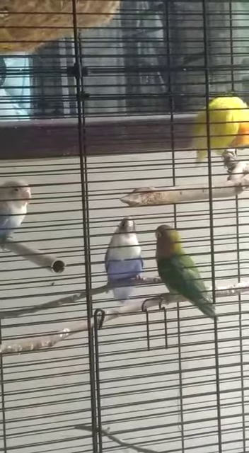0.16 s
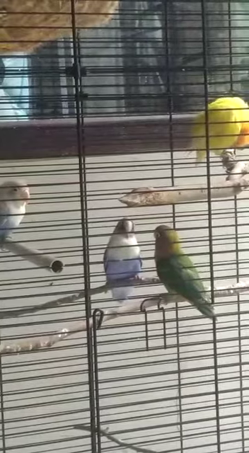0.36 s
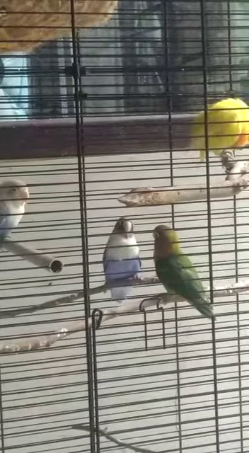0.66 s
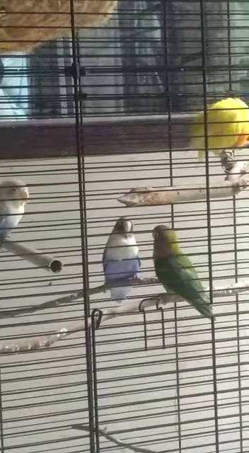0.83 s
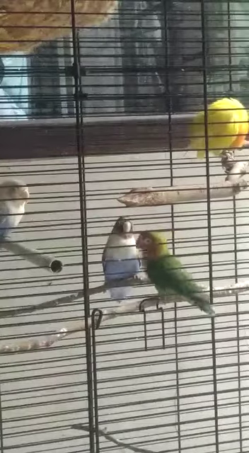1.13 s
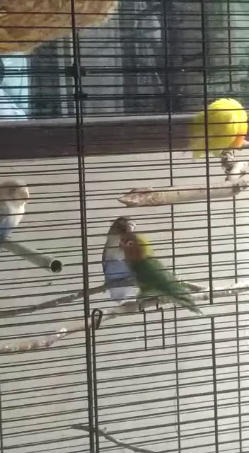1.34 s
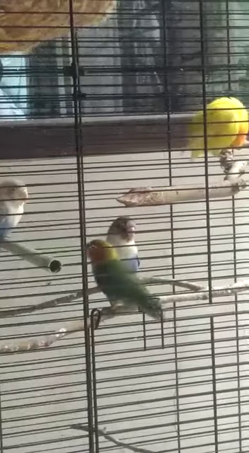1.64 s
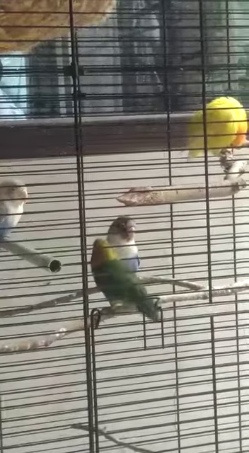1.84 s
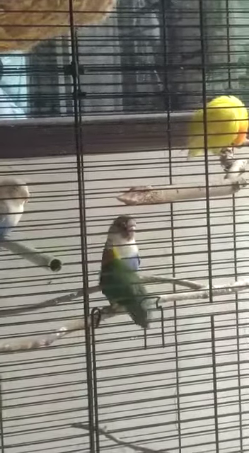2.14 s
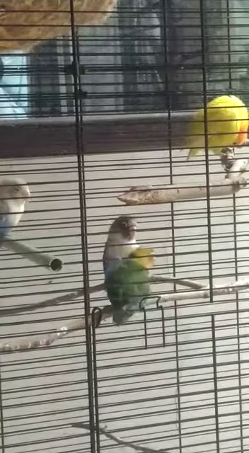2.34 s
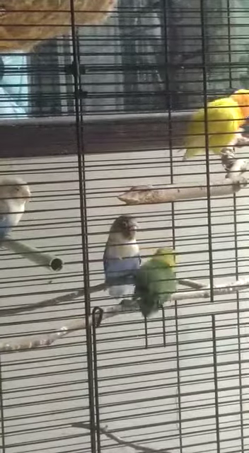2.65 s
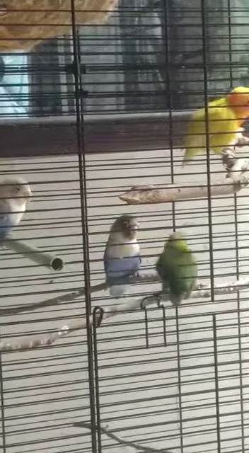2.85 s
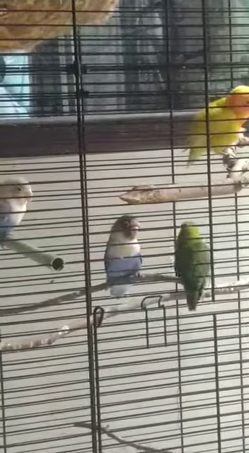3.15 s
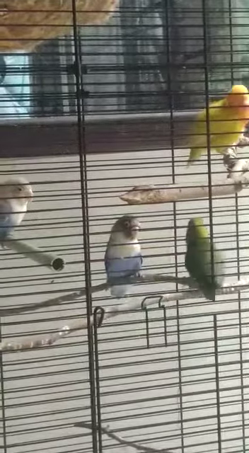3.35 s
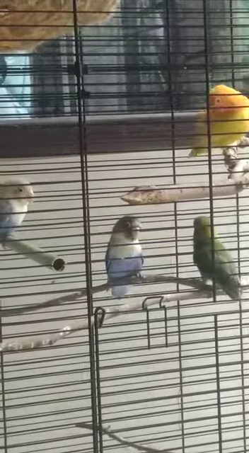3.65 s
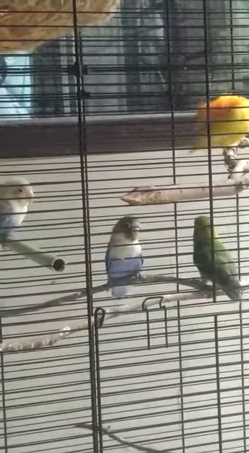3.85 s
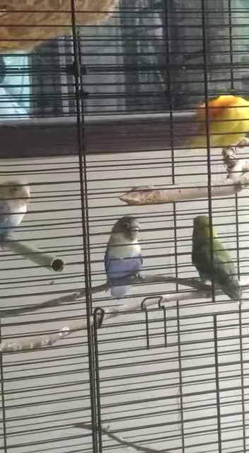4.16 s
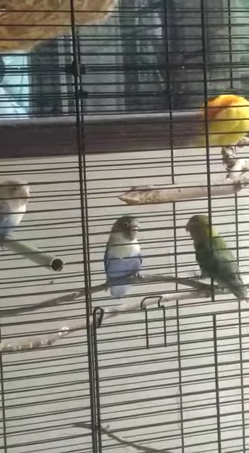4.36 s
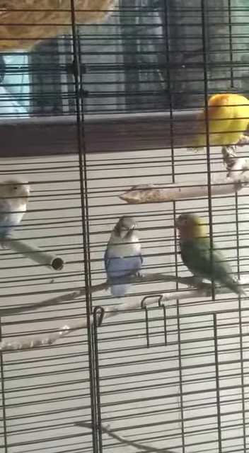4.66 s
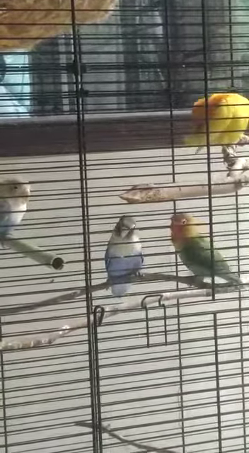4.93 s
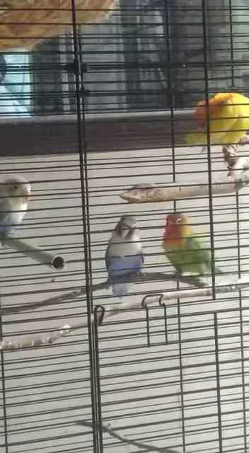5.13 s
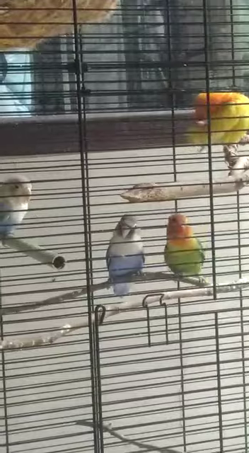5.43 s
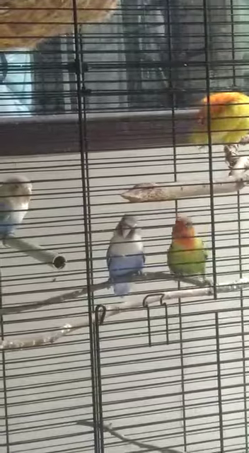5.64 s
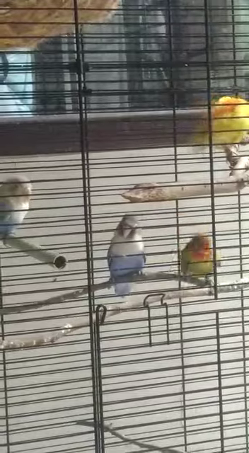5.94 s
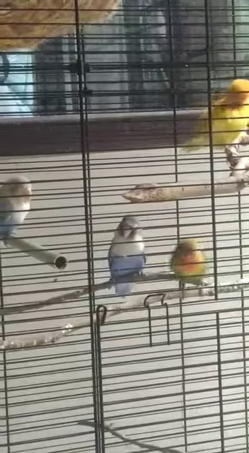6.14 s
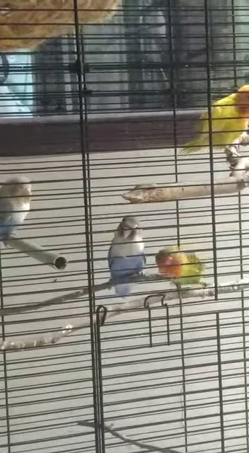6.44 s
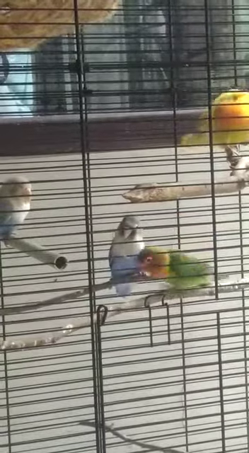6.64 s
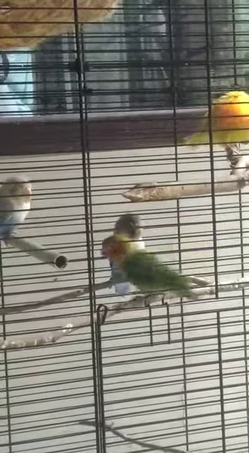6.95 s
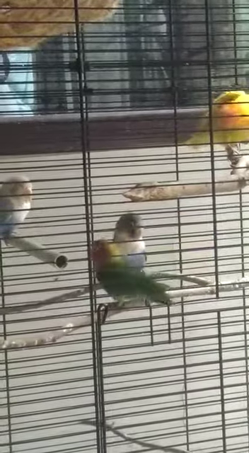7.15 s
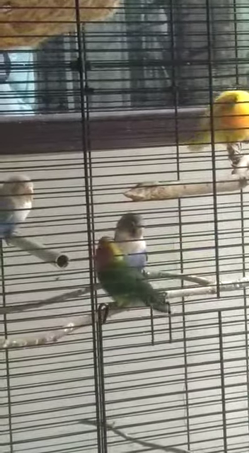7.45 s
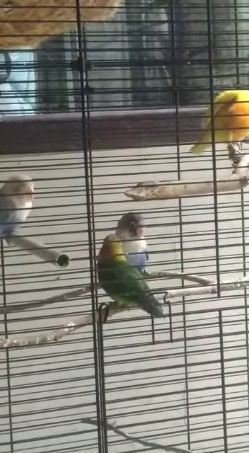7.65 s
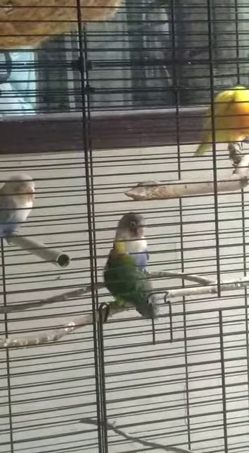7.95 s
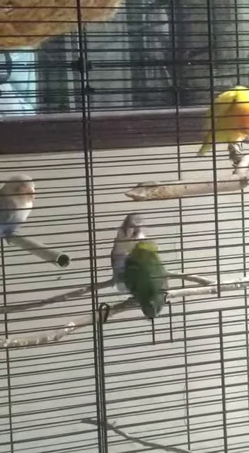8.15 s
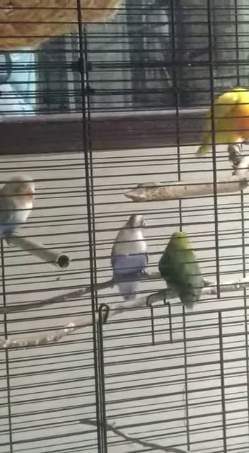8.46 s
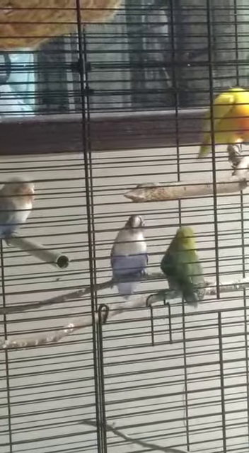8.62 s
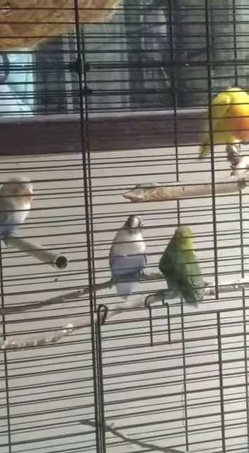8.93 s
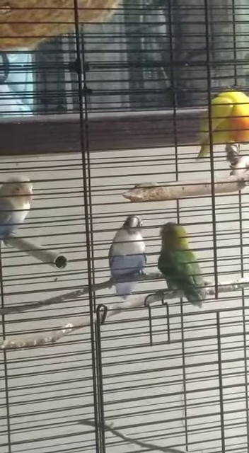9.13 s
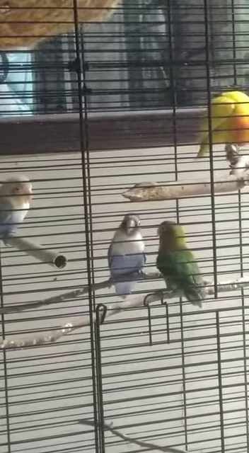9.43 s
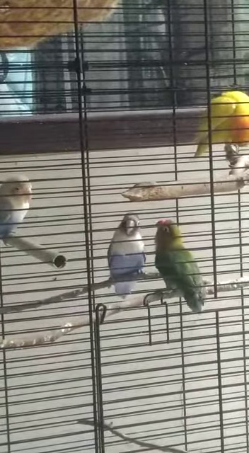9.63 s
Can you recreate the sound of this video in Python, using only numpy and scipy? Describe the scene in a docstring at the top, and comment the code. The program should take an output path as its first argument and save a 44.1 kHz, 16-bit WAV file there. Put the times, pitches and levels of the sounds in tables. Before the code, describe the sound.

Several small caged parrots are heard indoors by a handheld microphone nearby. Soft, high cheeps that slide downward come one at a time, clustering around seven seconds, while perches rustle faintly. A close bird makes a short scratchy squeak early on, a piercing, rapidly bending outburst past eight seconds and a last sharp chirp near the end. Short reverberation follows each call, over unsteady engine-like drone, thin hum and soft hiss.

```python
"""First comes the dying echo of a whistle that ends as the sound begins, over rumble, a wavering hum and air hiss.
Small caged parrots in a hard-walled room: a near bird whistles loud bent notes, farther ones give falling cheeps.
Both voices are harmonic tones, each with a coloured hiss; feet and feathers rustle as puffs of filtered noise.
Random spectra make the air and traffic, resonated noise the hum, and sparse random echoes the room."""
import sys
import numpy as np
from scipy import signal
from scipy.fft import rfft, irfft
from scipy.io import wavfile
from scipy.ndimage import uniform_filter1d, map_coordinates

SR = 44100
rng = np.random.default_rng(int(sys.argv[2]) if len(sys.argv) > 2 else 0)


def waveform_to_disk(signal):
    """Save audio, clipped to [-1, 1], as 16-bit WAV at the path in sys.argv[1]."""
    frames = np.transpose(np.atleast_2d(signal))
    scaled = np.clip(frames, -1, 1) * 32767
    samples = np.round(scaled).astype(np.int16)
    wavfile.write(sys.argv[1], SR, samples)


N = 431738  # length in samples
LEAD_S = 0.1  # time computed ahead of zero, so that earlier sound leaves its echo

# Spectrum of the air noise: pitch_hz, density_db (relative, per Hz)
AIR_SPECTRUM = [(20, -45), (38, -35), (48, -8.5), (75, -1), (100, 0), (122, -7), (160, -7), (300, -11.5),
                (600, -13), (1300, -16.5), (3200, -21), (4200, -21), (6300, -27), (8500, -24),
                (10000, -34.5), (15800, -39.5)]
AIR_DB = -52  # overall rms level
# Likeness of the air noise at the two ears: pitch_hz, likeness (0-1)
EAR_LIKENESS = [(60, 1), (150, 0.92), (380, 0.74), (950, 0.22), (2000, 0)]
# Slow swells of traffic: start_s, drone_db, traffic_db (only its departure from the mean counts)
TRAFFIC = [(0.0, -67, -66.5), (0.19, -56, -57), (0.49, -63, -67.5), (0.65, -60, -59.5), (2.1, -65.5, -64),
           (2.53, -57, -56), (4.39, -55, -58), (4.55, -65, -56), (4.96, -63.5, -62), (7.12, -53.5, -58.5),
           (7.2, -62, -58.5), (8.24, -61, -57), (8.34, -65, -59.5), (8.97, -59, -56.5), (9.79, -61.5, -60)]
DRONE_HZ, DRONE_WANDER_HZ, WANDER_SPAN_S = 59.1, 4.1, 0.23  # middle pitch, rms wander, smoothing span
# Steady hum tones: pitch_hz, width_hz (of each of two resonances), level_db
HUM_TONES = [(257.6, 7.7, -66.5), (354, 8.4, -68), (780, 4.2, -69), (1295, 7, -70)]

# Decay of the room echoes: pitch_hz, t60_s
ROOM_DECAY = [(1500, 0.34), (2500, 0.41), (4200, 0.35), (5500, 0.4), (7000, 0.31), (9000, 0.39),
              (14000, 0.3)]
NEAR_ROOM_DB, FAR_ROOM_DB = -4, -1  # sent to the room by the near bird; by far birds and rustles
# Single bounces off the cage tray, perch and wall: delay_s, left_db, right_db, right_later_s
BOUNCES = [(.0011, -41, -15.5, 0.012), (.0023, -16.5, -3, 0.011), (.0062, -4, -5.5, -0.0085),
           (0.01, -18.5, -8.5, -0.024)]
RIGHT_LAG_S = 0.000032  # direct sound arrives later at the right

# Rustles on the perches: start_s, level_db (before a common 9 dB cut), centre_hz, t60_s
RUSTLES = [(0.376, -40.5, 781, 0.11), (0.706, -44.5, 1290, 0.14), (2.062, -53, 2280, 0.22),
           (2.285, -44.5, 705, 0.36), (2.637, -46.5, 770, 0.55), (3.968, -43.5, 606, 0.27),
           (5.233, -46.5, 791, 0.56), (5.33, -47, 740, 0.15), (6.156, -48, 1290, 0.13),
           (6.423, -40, 950, 0.09), (6.982, -40.5, 1250, 0.18), (7.061, -40, 970, 0.3),
           (7.188, -41.5, 770, 0.092), (7.302, -43, 1030, 0.11), (8.159, -42, 1130, 0.18),
           (8.789, -41.5, 767, 0.16)]

# Colour of the hiss that goes with each whistle: pitch_hz, response_db (relative)
HISS_COLOUR = [(1200, -86), (2000, -8), (2500, 6), (3000, 4), (5000, 1.5), (7000, 5), (9000, 2.5),
               (12000, -29), (15000, -16)]
# Third, fourth and fifth harmonics: level_db (above the second)
UPPER_HARMONICS_DB = [-8.5, -9, -17]
PITCH_WOBBLE = 0.017  # rms unsteadiness as a share of the pitch
OVERTONE_TOP_HZ = 15200  # overtones fade around here

# Far cheeps: start_s, held_s, length_s, held_hz, end_hz, drop_share (0-1 of the fall taken fast),
# level_db, end_db (above level_db)
CHEEPS = [(1.136, .016, 0.12, 6980, 4020, 0.48, -51, -13), (2.369, 0.013, .1, 6770, 3700, 0.48, -50.5, -9),
          (3.25, .025, .105, 6910, 3570, .32, -51, -9), (3.879, 0.019, 0.12, 6770, 3790, 0.47, -50, -9.5),
          (5.195, .014, .11, 6900, 3700, 0.49, -52.5, -7.5), (6.851, .02, 0.12, 7220, 3460, 0.33, -52, -7),
          (6.969, .013, 0.12, 6560, 3480, 0.45, -50, -10), (7.164, 0.014, .05, 4340, 3650, 0.34, -58, -8),
          (8.105, .023, .091, 6530, 3620, 0.34, -55, -1), (8.213, .012, .038, 7240, 5070, 0.5, -52, 6),
          (8.908, 0.013, 0.099, 6340, 3610, 0.33, -51, -9),
          (9.282, 0.017, 0.12, 6670, 3410, 0.33, -58.5, -8),
          (9.478, 0.015, .079, 5500, 3610, 0.35, -65.5, 1)]
DROP_S = 0.0098  # time of the fast pitch drop
SCOOP = 0.88  # a cheep slides up to its held pitch from this share of it
SWELL_DB, FAR_PAN_DB = -14, -2.5  # starting level above the held one; left minus right
CURVE, CURVE_PER_DROP = 4.1, -6  # the smaller the drop, the more bowed the sag
EVEN_DROP, SHIFT_DB_PER_DROP = 0.44, 26  # a larger drop moves strength from held pitch to sag
UNDER_DB, UNDER_DB_PER_DROP = -15.5, 60  # lower octave at an even drop; change with the drop

# Near notes: hiss_db (under the tone at middle pitch), bright_db, bends (start_s, pitch_hz, level_db)
NOTES = [ (-14, 3, [(-.06, 3687, -27), (-.05, 6200, -19), (-.04, 5700, -20.5), (-.03, 4000, -21),
         (-.018, 4614, -19.5), (-.002, 5200, -22)]), (-13, -5, [(2.671, 2700, -41), (2.676, 2030, -41.5),
         (2.687, 2350, -44)]), (-13.5, -2, [(2.685, 5530, -46), (2.698, 5660, -55), (2.704, 4320, -40),
         (2.711, 3420, -45), (2.718, 3090, -32), (2.73, 2820, -45), (2.742, 2750, -40)]),
         (-17, 0.5, [(2.8, 1960, -33.5), (2.804, 2050, -39.5), (2.813, 2020, -41)]),
         (-19, 3, [(2.82, 2020, -52), (2.826, 2090, -43), (2.833, 1990, -52)]),
         (-9.5, 2.5, [(2.857, 2040, -48), (2.868, 2033, -52), (2.874, 3920, -40), (2.882, 3825, -39),
         (2.886, 4600, -37), (2.897, 3920, -35.5), (2.908, 3514, -33.5), (2.912, 2665, -30),
         (2.917, 3210, -36.5), (2.92, 4640, -24.5), (2.926, 5300, -47)]), (-6, 6, [(8.2597, 3550, -37),
         (8.2615, 3880, -23), (8.2632, 3530, -31)]), (-6, -3, [(8.267, 3900, -23), (8.27, 3020, -23),
         (8.273, 2610, -30)]), (-9, 8.5, [(8.274, 2650, -24), (8.283, 2840, -21), (8.289, 2740, -27.5),
         (8.292, 2370, -28)]), (-10, 2, [(8.292, 4800, -22), (8.296, 4550, -10), (8.299, 4690, -19),
         (8.303, 5900, -14), (8.307, 6600, -25), (8.313, 6060, -27)]), (-25, 0, [(8.313, 5910, -29),
         (8.317, 5360, -35), (8.322, 4090, -12), (8.337, 3580, -18.5), (8.341, 3900, -25),
         (8.344, 4550, -18), (8.347, 4760, -17.5)]), (-22.5, 1.5, [(8.346, 6290, -11.5),
         (8.354, 6400, -16.5), (8.364, 5220, -14.5), (8.369, 5260, -14), (8.377, 5920, -28),
         (8.38, 5980, -30)]), (-26, -4, [(8.418, 1607, -49), (8.426, 1963, -32), (8.431, 3160, -22.5),
         (8.436, 4570, -21.5), (8.442, 5680, -33), (8.445, 6040, -24), (8.449, 4770, -24),
         (8.453, 4165, -14.5), (8.46, 4313, -10.5), (8.467, 4133, -15)]), (-23, 1, [(9.636, 4640, -38),
         (9.639, 5400, -22.5), (9.643, 6300, -35), (9.647, 6200, -21.5), (9.652, 6300, -23)]),
         (-8, 1, [(9.654, 6480, -33), (9.657, 6330, -29), (9.66, 4380, -18), (9.663, 3800, -27),
         (9.667, 2944, -22.5), (9.673, 2506, -29), (9.684, 2760, -40), (9.692, 2352, -27.5),
         (9.699, 2524, -35), (9.707, 2160, -29)]), (-12, 6.5, [(9.709, 3400, -26), (9.712, 3720, -22.5),
         (9.719, 4170, -19.5), (9.726, 4330, -18), (9.733, 4070, -22)]), (-15, -2, [(9.734, 4130, -20),
         (9.738, 5960, -25), (9.743, 6500, -27.5), (9.765, 6570, -37)])]
# Second harmonic against the note's pitch: pitch_hz, level_db (above the first)
SECOND_HARMONIC = [(2000, -14.5), (2600, -7), (3500, -8), (4300, -16.5), (5300, -20.5), (6400, -9.5)]
HISS_DB_PER_OCTAVE, MIDDLE_HZ = 3, 4000  # low stretches of a note are hoarser
UNEVEN_DB, RASP = 1.1, 0.11  # rms unevenness of the level; rms flutter as a share
NEAR_PAN_DB = -2.5  # left minus right

# Microphone colour: pitch_hz, response_db
MICROPHONE = [(7000, 0.02), (8500, -0.74), (9800, -1.5), (11300, -0.5), (12500, -3), (14000, -1),
              (15000, -0.5)]
EDGE_HZ = 15750  # band limit


def gain_of(db):
    """The decibel as a logarithmic amplitude ratio: returns the gain."""
    return 10 ** (np.asarray(db) / 20)


def evened(x):
    """Normalises effective (rms) amplitude to 1."""
    return x / np.sqrt(np.mean(x ** 2) + 1e-20)


def read(points, hz):
    """Interpolates a table on a logarithmic frequency axis."""
    f, value = np.transpose(points)
    return np.interp(np.log(hz + 1), np.log(f + 1), value)


def drift(n, span):
    """Smoothed random fluctuation: noise of rms 1 averaged twice over span samples."""
    once = uniform_filter1d(rng.standard_normal(n), int(span))
    return evened(uniform_filter1d(once, int(span)))


def resonate(x, hz, width):
    """Resonance by heterodyning: shifts hz down to zero, smooths, and shifts back."""
    carrier = np.exp(2j * np.pi * np.cumsum(hz * np.ones(len(x))) / SR)
    r = np.exp(-np.pi * width / SR)
    return 2 * (carrier * signal.lfilter([1 - r], [1, -r], x / carrier)).real


def add(mix, s, sound, pan_db=0):
    """Superposition with a level difference between ears; the mix begins LEAD_S before zero."""
    part = mix[:, round((s + LEAD_S) * SR):][:, :len(sound)]
    part += gain_of([[pan_db / 2], [-pan_db / 2]]) * sound[:part.shape[1]]


def air():
    """Partly coherent noise: random short-time spectra in drifting patches, swelling low down with traffic."""
    frames, hz = N // 512 + 5, np.fft.rfftfreq(2048, 1 / SR)
    a, b, c, d, patches = rng.standard_normal((frames, len(hz), 5)).T
    patches = evened(uniform_filter1d(uniform_filter1d(patches, 24, 0), 5, 1))
    t = np.arange(frames) * 512 / SR
    s, _, traffic_db = np.transpose(TRAFFIC)
    reach = 1 / (1 + (hz / 160) ** 2)  # how far up the swell is felt
    swell_db = reach[:, None] * (np.interp(t, s, traffic_db) - traffic_db.mean())
    likeness = np.clip(read(EAR_LIKENESS, hz), -1, 1)[:, None]
    left = a + 1j * b
    right = likeness * left + np.sqrt(1 - likeness ** 2) * (c + 1j * d)
    colour_db = read(AIR_SPECTRUM, hz)[:, None] + 1.3 * patches + swell_db
    spectra = np.array([left, right]) * gain_of(colour_db)
    noise = signal.istft(spectra, nperseg=2048, noverlap=1536)[1][:, :N]
    return gain_of(AIR_DB) * evened(noise)


def hum():
    """Narrow-band noise: fuzzy steady tones and a low wandering engine drone, alike in both ears."""
    noise, t = rng.standard_normal(N), np.arange(N) / SR
    s, drone_db, _ = np.transpose(TRAFFIC)
    drone_hz = DRONE_HZ + DRONE_WANDER_HZ * drift(N, WANDER_SPAN_S * SR)
    drone = evened(resonate(resonate(noise, drone_hz, 8.1), drone_hz, 8.5))
    total = gain_of(np.interp(t, s, drone_db)) * drone
    for hz, width, db in HUM_TONES:
        total += gain_of(db) * evened(resonate(resonate(noise, hz, width), hz, width))
    return total


def room(x):
    """Diffuse reverberation: sparse echoes of random sign, separate per ear, each band with its own decay."""
    taps = np.zeros((2, 30000))
    grid = np.arange(260, 29900, 24)
    at = grid + rng.integers(0, 24, (2, len(grid)))
    np.put_along_axis(taps, at, rng.choice([-1., 1.], at.shape), 1)
    hz, t, z = signal.stft(taps, SR, nperseg=256)
    early = 1 + 0.23 * np.exp(-t / 0.019)  # the cage corner and near walls answer first
    decay = gain_of(-60 * t / read(ROOM_DECAY, hz)[:, None])
    tail = signal.istft(z * early * decay, SR, nperseg=256)[1]
    return signal.fftconvolve(x, tail / np.linalg.norm(tail[0]), axes=1)[:, :x.shape[1]]


def bounce(x):
    """Specular reflection: the direct sound plus a few delayed copies of it."""
    taps = np.zeros((2, 800))
    taps[:, 0] = 1
    for s, left_db, right_db, later in BOUNCES:
        taps[0, round(s * SR)] += gain_of(left_db)
        taps[1, round((s + later) * SR)] += gain_of(right_db)
    return signal.oaconvolve(x, taps, axes=1)[:, :x.shape[1]]


def rustle(db, hz, t60):
    """Friction noise: a soft scratchy puff, broad around its centre, decaying exponentially."""
    t = np.arange(0, 0.25, 1 / SR)
    grit = rng.standard_normal(len(t)) * gain_of(2.5 * drift(len(t), 90))
    attack = np.minimum(t / 0.0042, 1)
    return gain_of(db - 9 - 60 * t / t60) * attack * evened(resonate(grit, hz, 1060))


def whistle(hz, level_db, second_db, rasp, hiss_db):
    """A syrinx as harmonic source: uneven air flow shakes pitch and strength; a coloured hiss goes along."""
    n = len(hz)
    phase = 2 * np.pi * np.cumsum(hz * (1 + PITCH_WOBBLE * drift(n, 30))) / SR
    flutter = 1 + rasp * drift(n, 34)
    harmonics_db = [0, second_db] + [second_db + db for db in UPPER_HARMONICS_DB]
    tone = np.zeros(n)
    for k, db in enumerate(harmonics_db, start=1):
        fade = 1 + (k * hz / OVERTONE_TOP_HZ) ** 12
        tone += gain_of(db) * np.sin(k * phase) / fade
    white = rfft(rng.standard_normal(n))
    hiss = evened(irfft(white * gain_of(read(HISS_COLOUR, np.fft.rfftfreq(n, 1 / SR))), n))
    # short linear ramps at both ends
    ramp = np.minimum(np.arange(n), np.arange(n)[::-1]) / (0.00095 * SR)
    voice = np.sqrt(2) * tone + gain_of(hiss_db) * hiss
    return gain_of(level_db) * voice * flutter * np.minimum(ramp, 1)


def cheep(held, length, held_hz, end_hz, drop, db, end_db):
    """Frequency glide of a far bird: holds a high pitch, drops fast, then sags ever more slowly."""
    t = np.arange(0, length, 1 / SR)
    knee = held + DROP_S
    knee_hz = held_hz - drop * (held_hz - end_hz)
    curve = CURVE + CURVE_PER_DROP * drop
    u = np.clip((t - knee) / (length - knee), 0, 1)
    sag = (1 - np.exp(-curve * u)) / (1 - np.exp(-curve))
    bend_hz = [SCOOP * held_hz, held_hz, 0.985 * held_hz, knee_hz]
    glide_hz = np.interp(t, [0, held / 3, held, knee], bend_hz) + (end_hz - knee_hz) * sag
    hz = uniform_filter1d(glide_hz, size=120)

    excess = drop - EVEN_DROP
    shift_db = SHIFT_DB_PER_DROP * excess
    shape_db = [SWELL_DB - shift_db, -shift_db, -shift_db, shift_db, end_db]
    level_db = db + np.interp(t, [0, held / 2, held, knee, length], shape_db)
    # the lower octave sinks by 25 dB once the held pitch ends
    under_db = db + UNDER_DB + UNDER_DB_PER_DROP * excess - np.interp(t, [held, knee], [0, 25])
    level_db = level_db + 3.2 * drift(len(t), 200)  # the breath comes unevenly
    hz = hz * (1 + 0.008 * drift(len(t), 300))  # and kinks the glide
    second_db = np.interp(t, [held, knee], [-11, -19])
    voice = whistle(hz, level_db, second_db, rasp=0.18, hiss_db=-10.5)
    return voice + whistle(hz / 2, under_db, -34, rasp=0.19, hiss_db=-32)


def note(hiss_db, bright_db, bends):
    """Frequency modulation of the near bird: bends rounded over a millisecond, overtones following pitch."""
    s, *columns = np.transpose(sorted(bends))
    t = np.arange(s[0], s[-1] + 0.0017, 1 / SR)
    hz, level_db = (uniform_filter1d(np.interp(t, s, c), size=40) for c in columns)
    level_db = level_db + UNEVEN_DB * drift(len(t), 110)
    second_db = read(SECOND_HARMONIC, hz) + bright_db
    hoarse_db = hiss_db + HISS_DB_PER_OCTAVE * np.log2(MIDDLE_HZ / hz)
    return s[0], whistle(hz, level_db, second_db, RASP, hoarse_db)


def scene():
    """Superposes direct sound, reflections and reverberation of birds and rustles on the background."""
    near, far = np.zeros((2, 2, N + round(LEAD_S * SR)))
    for row in NOTES:
        add(near, *note(*row), pan_db=NEAR_PAN_DB)
    for s, *shape in CHEEPS:
        add(far, s, cheep(*shape), FAR_PAN_DB)
    for s, *shape in RUSTLES:
        add(far, s, rustle(*shape))
    echoes = room(gain_of(NEAR_ROOM_DB) * near + gain_of(FAR_ROOM_DB) * far)
    left, right = bounce(near + far)
    places = np.arange(len(right)) - RIGHT_LAG_S * SR
    direct = np.array([left, map_coordinates(right, [places], order=3)])
    return (direct + echoes)[:, -N:] + air() + hum()


def record(dry):
    """Linear filtering and compression: microphone colour, gain control on the loudest calls, band limit."""
    dry = irfft(rfft(dry) * gain_of(read(MICROPHONE, np.fft.rfftfreq(N, 1 / SR))), N)
    power_db = 10 * np.log10(abs(uniform_filter1d((dry ** 2).mean(0), 600)) + 1e-12)
    fall_db = np.arange(N) * 60 / SR  # the held peak falls 60 dB a second
    peak_db = np.maximum.accumulate(power_db + fall_db) - fall_db
    over_db = np.maximum(peak_db + 23.5, 0)  # excess above -23.5 dB
    ducked = dry / gain_of(0.26 * uniform_filter1d(over_db, size=200))
    low_pass = signal.firwin(1023, EDGE_HZ, window=("kaiser", 9), fs=SR)
    return signal.oaconvolve(ducked, low_pass[None], "same", axes=1)


dry = scene()
out = record(dry)
waveform_to_disk(out)
```